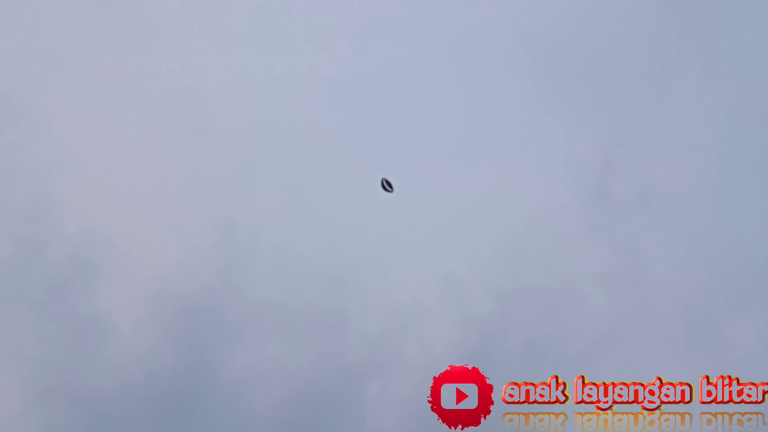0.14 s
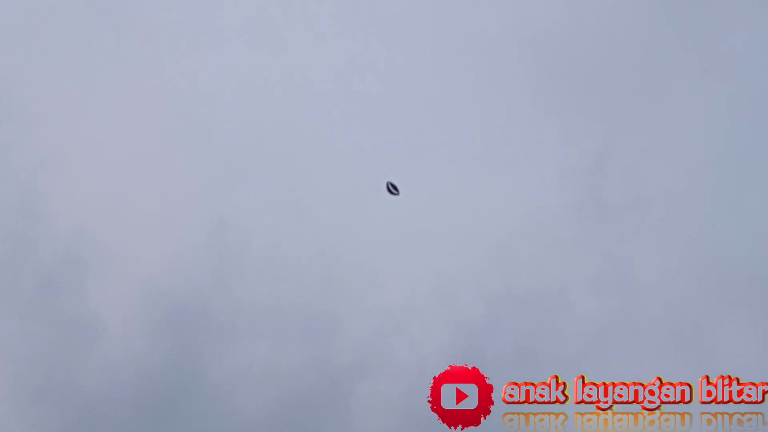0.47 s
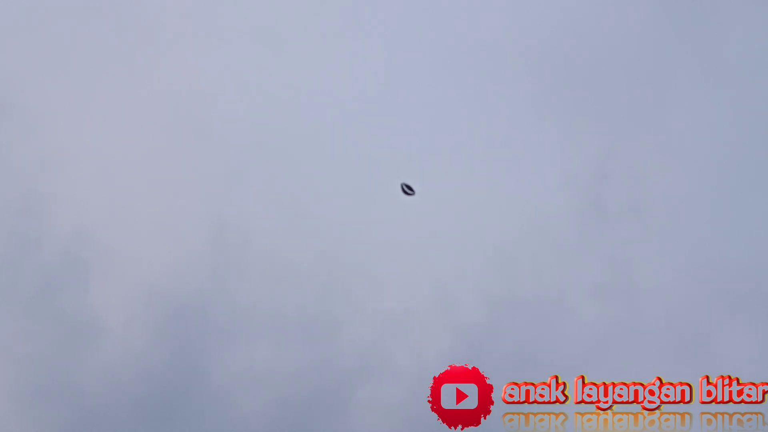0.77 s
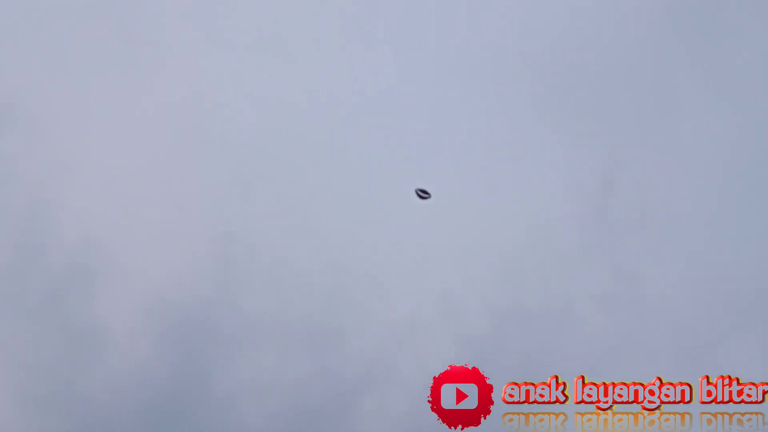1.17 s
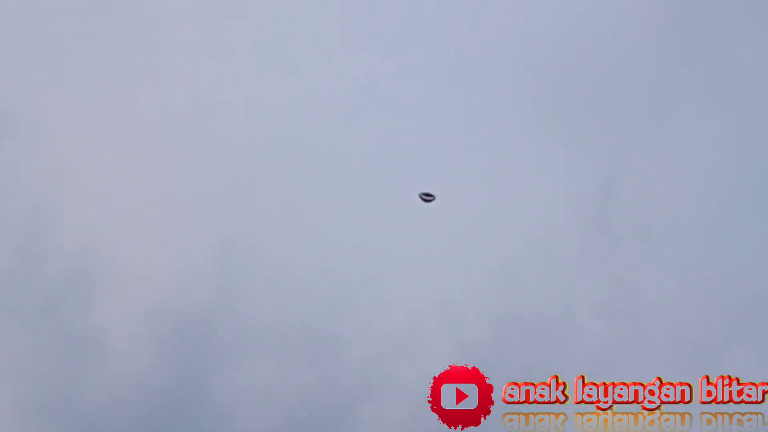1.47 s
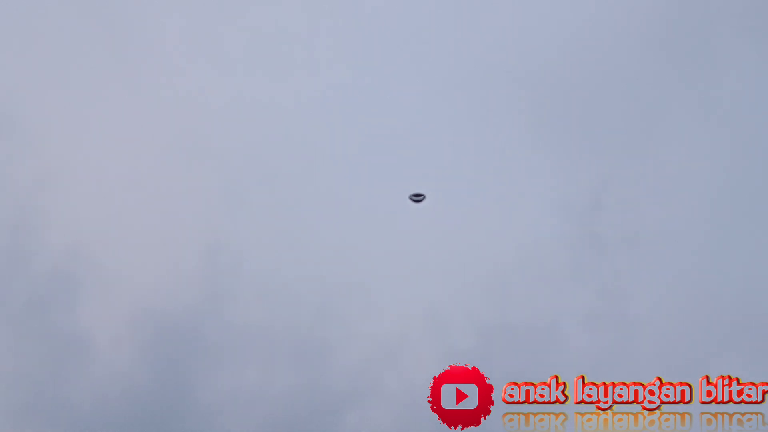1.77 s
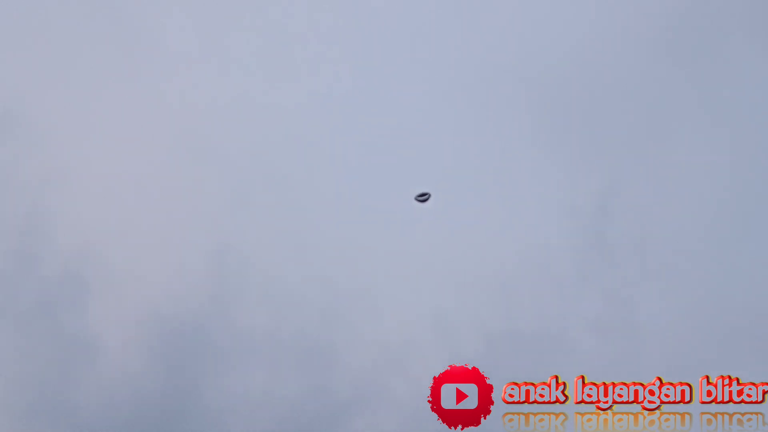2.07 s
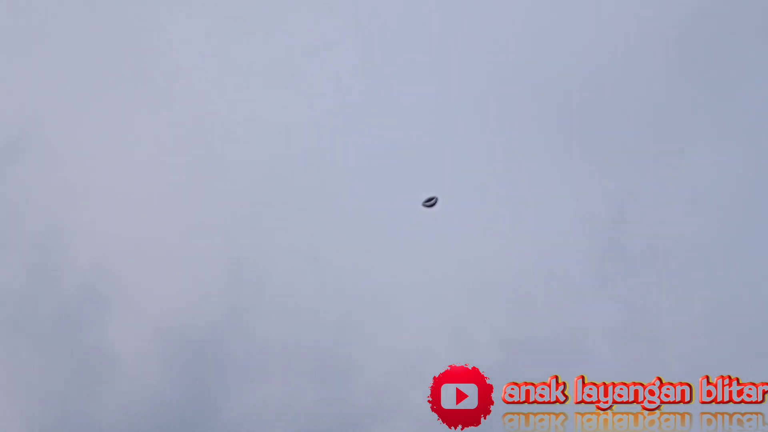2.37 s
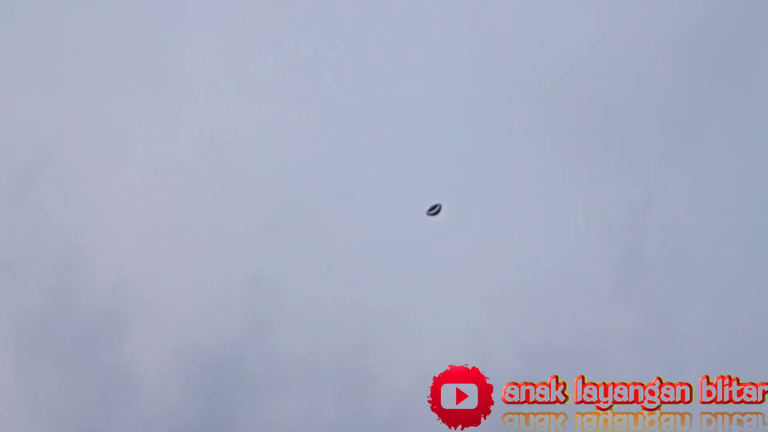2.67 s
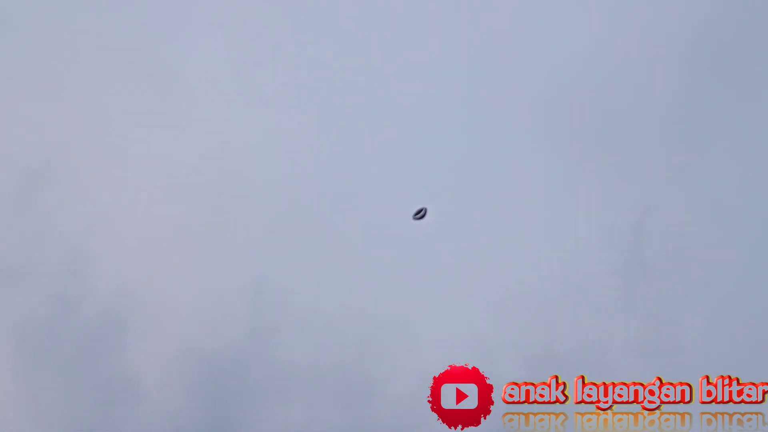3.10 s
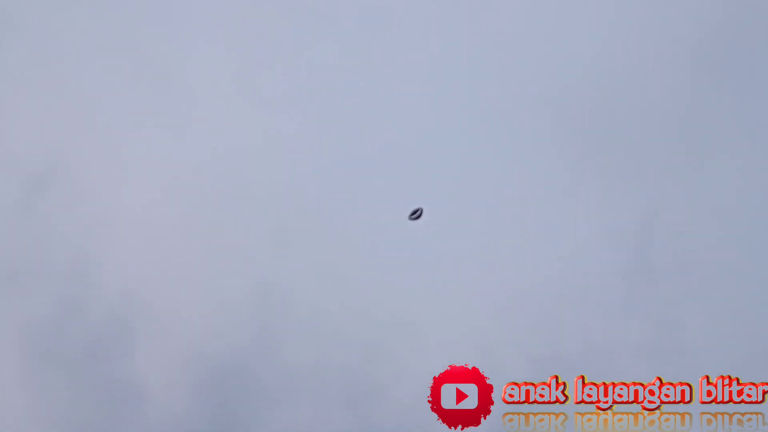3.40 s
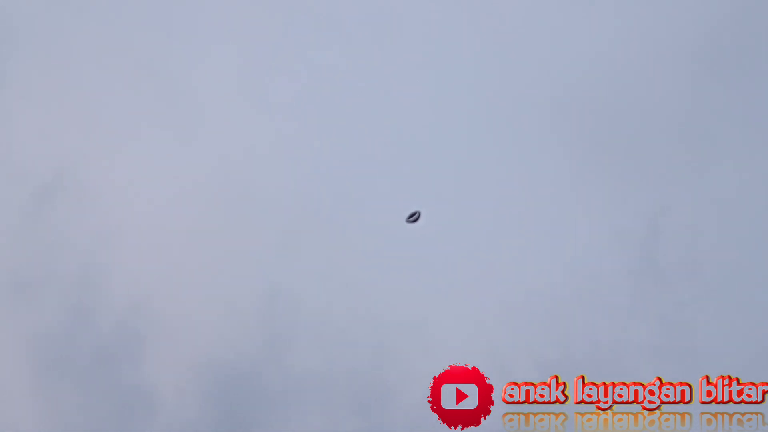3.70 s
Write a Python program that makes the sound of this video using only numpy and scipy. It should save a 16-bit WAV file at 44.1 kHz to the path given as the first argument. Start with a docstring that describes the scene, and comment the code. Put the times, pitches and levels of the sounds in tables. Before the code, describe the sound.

A kite's hummer drones with a fast, even warble in soft wind outdoors.

```python
"""From the start soft wind blows over a field, insects buzz, and air hisses over the ribbon of a high kite.
The ribbon twists to and fro eleven times a second and sounds a short arched note each way, one strong,
one weak. The ground echo splits the strong note in two; trees and houses scatter weak late echoes.
Faint far tones come and go, with small bright ticks at 0.6 s and 2.4 s. After 2 s the hum sinks
while the kite turns, and by 3 s it has returned."""
import sys
import numpy as np
from scipy import signal
from scipy.fft import rfft, irfft
from scipy.io import wavfile
from scipy.ndimage import uniform_filter1d

SR = 44100
rng = np.random.default_rng(int(sys.argv[2]) if len(sys.argv) > 2 else 0)


def file_out(sig):
    """Save sig as 16-bit WAV at sys.argv[1]."""
    # one column per channel
    cols = np.atleast_2d(sig).T
    # limit, then scale
    lim = np.clip(cols, -1, 1)
    pcm = np.round(lim * 32767).astype(np.int16)
    wavfile.write(sys.argv[1], SR, pcm)


N = 169785
T = np.arange(N) / SR
SWING_PERIOD_S, FIRST_SWING_S = .08992, .0525
# the kite's flight: t/s, pitch f/Hz, strong note level/dB, weak note level/dB,
# earlier arrival t/ms, ground echo delay t/ms
FLIGHT = [(0, 694, -16.5, -24.5, 0, 5), (.3, 687.4, -10.5, -23.3, -1, 5.01),
          (.65, 683.3, -9.5, -24, 0.7, 5.08), (1.1, 707.7, -13, -23, -0.2, 4.84),
          (1.45, 683, -7, -24, 0.8, 5.15), (1.75, 690, -14, -25, -1.14, 4.91),
          (2.05, 668, -15.5, -29.5, -0.94, 5.13), (2.35, 680, -22.5, -32, 1.5, 5.1),
          (2.6, 670, -19, -28.5, 3, 5.11), (2.85, 693, -16.5, -21.2, 4.5, 4.97),
          (3.1, 687.3, -11, -18.5, 4, 5.11), (3.45, 680, -11, -19.5, 4, 5.2),
          (3.85, 684, -15, -23, 3.5, 4.9)]


def amp(db):
    """Amplitude ratio of a level in decibels."""
    return 10 ** (np.asarray(db) / 20)


def unit(x):
    """Normalisation to rms 1."""
    return x / np.sqrt(np.mean(x ** 2) + 1e-20)


def curve(table, t, column=1):
    """Linear interpolation of one column at times t."""
    rows = np.array(table)
    return np.interp(t, rows[:, 0], rows[:, column])


def add(mix, start_s, sound):
    """Superposition of a sound on the mix."""
    at = round(start_s * SR)
    part = mix[max(at, 0):max(at + len(sound), 0)]
    part += sound[max(-at, 0):][:len(part)]


def drift(hz):
    """Random fluctuation of rms 1: noise under a Gaussian low-pass."""
    lowpass = np.exp(-(np.fft.rfftfreq(N, 1 / SR) / hz) ** 2)
    return unit(irfft(rfft(rng.standard_normal(N)) * lowpass, N))


def band(hz, width_hz):
    """A resonance driven by white noise, at rms 1."""
    detuning = (np.fft.rfftfreq(N, 1 / SR) - hz) / width_hz
    return unit(irfft(rfft(rng.standard_normal(N)) / (1 + detuning ** 2) ** 2, N))


def noise(spectrum, patch_db):
    """Spectrally shaped noise of rms 1, its level varying in patches of time and frequency."""
    hz = np.fft.rfftfreq(2048, 1 / SR)
    real, imag, patches = rng.standard_normal((3, N // 512 + 5, len(hz)))
    patches = unit(uniform_filter1d(uniform_filter1d(patches, size=7, axis=0), size=12, axis=1))
    f, db = np.transpose(spectrum)
    frames = (real + 1j * imag) * amp(np.interp(np.log(hz + 1), np.log(f), db) + patch_db * patches)
    return unit(signal.istft(frames.T, nperseg=2048, noverlap=1536)[1][:N])


def wind():
    """Broadband noise of soft wind, almost steady in level."""
    # wind and distant background: f/Hz, relative spectral level/dB
    spectrum = [(20, -43), (40, -43), (50, -27), (60, -6.5), (110, -3.5), (160, 2), (200, -10.5),
                (260, 3.5), (330, -3.5), (500, 4.5), (700, -3), (950, -11), (1500, -13), (2200, -22.5),
                (3500, -16.5), (5500, -30.5), (9000, -26), (11200, -23), (11800, -42), (13000, -42),
                (15400, -37)]
    return amp(-34 + .16 * drift(4)) * noise(spectrum, patch_db=1)


def insects(pulses_per_s=122):
    """Amplitude modulation: a near insect pulses a narrow band in throbs, over a flickering chorus."""
    # the near insect's rhythm: t/s, running count of throbs
    throbs = [(.015, 0), (2.47, 24), (3.06, 30), (3.88, 38)]
    # insect chorus: f/Hz, relative spectral level/dB
    chorus_spectrum = [(5000, -34), (6200, -12), (6700, -2.5), (7100, 1), (7400, -1.5), (7750, 2),
                       (8200, -4.5), (8600, -15), (9600, -19), (11000, -50), (12000, -43)]
    throb = .22 + .78 * np.cos(np.pi * curve(throbs, T)) ** 2
    cycle = np.cumsum(pulses_per_s * (1 + .018 * drift(15))) / SR % 1
    pulse = np.minimum(cycle / .14, 1) * (.2 + np.exp(-cycle / .68))
    near = amp(-42) * unit(throb * pulse * band(hz=7043, width_hz=265))
    chorus_db = -41 + .82 * drift(170) + .91 * drift(4.8)
    return near + amp(chorus_db) * noise(chorus_spectrum, patch_db=.5)


def ribbon_rush(trim_db=-2):
    """Flow noise: air hisses over the ribbon, swelling slightly twice a swing."""
    # strength of the hiss: t/s, level/dB before the trim
    levels = [(0.0, -37), (0.4, -41), (1.11, -37), (1.73, -39), (2.14, -49.5), (2.84, -45.5), (3.33, -39),
              (3.84, -43.5), (3.85, -59)]
    # colour of the hiss: f/Hz, relative spectral level/dB
    spectrum = [(300, -14), (900, 7), (1600, 3.5), (2300, 3), (2750, -2.5), (3250, 4), (3650, 4),
                (4000, -1), (4500, -2), (5600, -9), (8000, -12), (12000, -50)]
    swings = (T - FIRST_SWING_S + curve(FLIGHT, T, column=4) / 1000) / SWING_PERIOD_S
    pulse = 1 + .19 * np.cos(2 * np.pi * 2 * swings)
    return amp(curve(levels, T) + trim_db) * pulse * noise(spectrum, patch_db=2)


def ribbon_hum(jitter_hz=2.2, jitter_db=.7, ground_gain=.86, ground_tilt_db=-2.5):
    """Torsional oscillation: pitch arches as the ribbon speeds up and slows; the ground echoes each note."""
    # strong and weak note: offset t/s, 1/e half-length t/s, pitch ratio, glide/(Hz/s),
    # arch/(Hz/s^2), stretch ratio of the overtones
    notes = [(0, 0.0064, 0.99, 1300, 467000, 1.025), (0.0429, 0.01, 0.9037, -400, 356000, .985)]
    # strong and weak note: base level/dB of partials 2 to 6, relative to the fundamental
    overtones = [(-17.5, -30, -38, -37.5, -41.5), (-8.5, -37.5, -32, -33, -35)]
    # overtone boost as the kite turns: t/s, strong note level/dB, weak note level/dB
    brightness = [(0, 5.5, 1), (.35, -3.5, 0.5), (.8, 0, 1.5), (1.25, 1.5, 3), (1.6, -2.5, -1.5),
                  (2.1, -2, -0.5), (2.6, -0.5, -3), (3.1, 0, -5), (3.85, 3.5, -1.5)]
    out = np.zeros(N)
    span = np.arange(-SR // 25, SR // 25) / SR
    for swing in np.arange(FIRST_SWING_S - SWING_PERIOD_S, T[-1] + SWING_PERIOD_S, SWING_PERIOD_S):
        pitch, *levels, early_ms, echo_ms = (curve(FLIGHT, swing, column) for column in range(1, 6))
        # direct and reflected path; the ground returns less of each higher overtone
        paths = (span, 1, 0), (span - echo_ms / 1000, ground_gain, ground_tilt_db)
        for i, (offset, half_length, ratio, glide, arch, stretch) in enumerate(notes):
            hz = pitch * ratio + jitter_hz * rng.standard_normal()
            gain = amp(levels[i] + jitter_db * rng.standard_normal())
            bright_db = curve(brightness, swing, column=1 + i)
            arrival = swing + offset - early_ms / 1000
            for t, path_gain, tilt_db in paths:
                phase = 2 * np.pi * (hz * t + glide * t ** 2 / 2 - arch * t ** 3 / 3)
                upper = sum(amp(db + bright_db + tilt_db * k) * np.sin(k * stretch * phase)
                            for k, db in enumerate(overtones[i], 2))
                envelope = path_gain * gain * np.exp(-(t / half_length) ** 2)
                add(out, arrival + span[0], envelope * (np.sin(phase) + upper))
    return out


def scatter(x, level_db=-13.5, t60_s=.34, echoes_per_s=2000):
    """Scattering from trees and houses: weak late echoes that decay exponentially."""
    t = T[:SR // 2]
    signs = rng.choice([-1., 1.], len(t))
    arrivals = (rng.random(len(t)) < echoes_per_s / SR) * (t > .012)
    response = signs * arrivals * amp(-60 * t / t60_s)
    return amp(level_db) * signal.fftconvolve(x, response / np.linalg.norm(response))[:N]


def far_tones():
    """Frequency glides: faint wavering tones swell, slide to their last pitch and fade."""
    # distant tones: start t/s, length t/s, first f/Hz, last f/Hz, level/dB before flutter
    tones = [(.08, 0.28, 280, 470, -31), (0.384, 0.22, 415, 481, -25.5), (0.506, .2, 310, 420, -37.5),
             (0.518, 0.23, 735, 698, -25.5), (0.908, 0.1, 725, 738, -27), (1.393, 0.22, 890, 945, -43),
             (1.59, .32, 890, 880, -43), (2.06, .16, 900, 876, -46), (2.267, 0.18, 895, 880, -40.5),
             (3.26, 0.63, 272, 270.8, -37), (3.618, 0.24, 495, 465, -36.5)]
    out, waver, flutter = np.zeros(N), drift(20.6), drift(6.8)
    for start, length, first_hz, last_hz, db in tones:
        progress = np.clip((T - start) / length, 0, 1)
        hz = (last_hz + (first_hz - last_hz) * (1 - progress) ** 1.7) * (1 + .00775 * waver)
        envelope = amp(db + 3.2 * flutter) * np.sin(np.pi * progress)
        out += envelope * np.sin(2 * np.pi * np.cumsum(hz) / SR)
    return out


def ticks(decay_s=.003):
    """Damped transients: bright noise bands start abruptly and decay exponentially."""
    # small ticks: t/s, centre f/Hz, onset level/dB
    onsets = [(.618, 7640, -30), (2.406, 5500, -39)]
    return sum(amp(db) * (T > start) * np.exp(-abs(T - start) / decay_s) * band(hz, width_hz=1500)
               for start, hz, db in onsets)


def scene():
    """Superposition of the kite, its echoes and the sounds of the field, in one channel."""
    hum = ribbon_hum()
    return (hum + scatter(hum) + ribbon_rush() + wind() + insects() + far_tones() + ticks())[None]


def record(dry, cutoff_hz=15550):
    """Band limiting by a linear-phase low-pass filter."""
    lowpass = signal.firwin(511, cutoff_hz, window=("kaiser", 9), fs=SR)
    return signal.oaconvolve(dry, lowpass[None], "same")


dry = scene()
out = record(dry)
file_out(out)
```